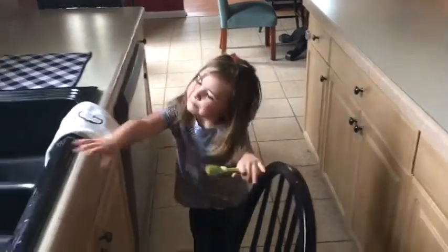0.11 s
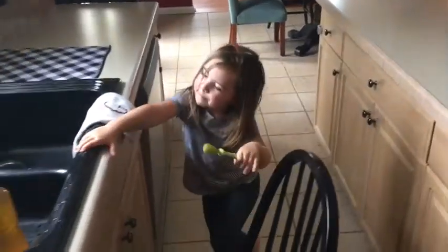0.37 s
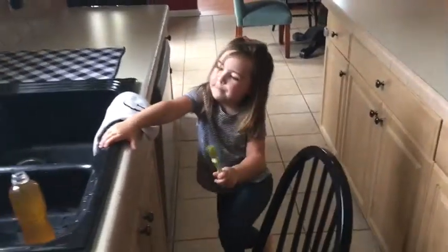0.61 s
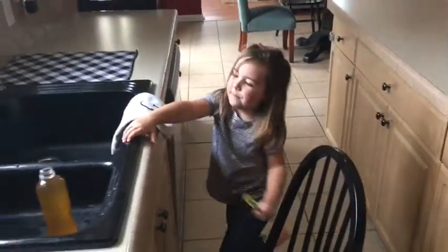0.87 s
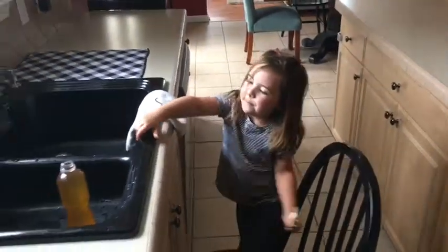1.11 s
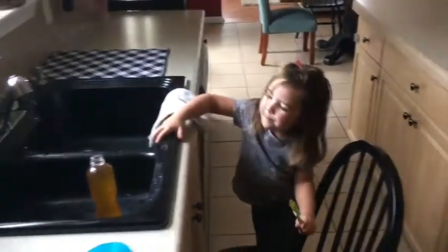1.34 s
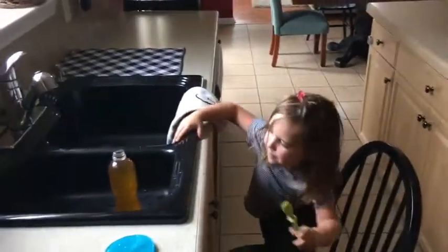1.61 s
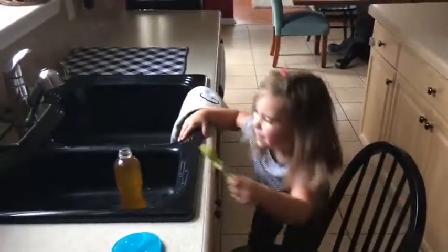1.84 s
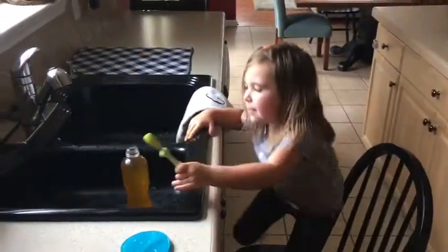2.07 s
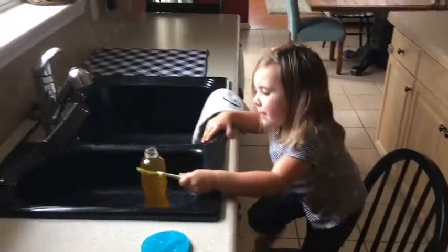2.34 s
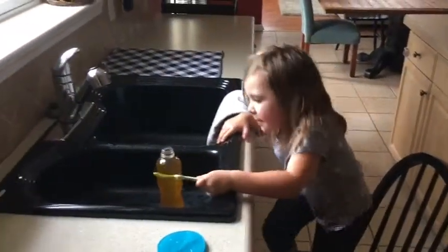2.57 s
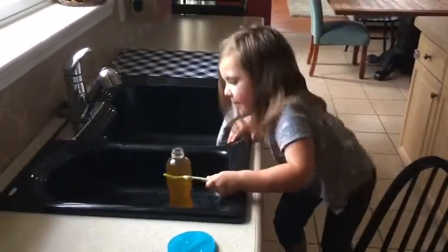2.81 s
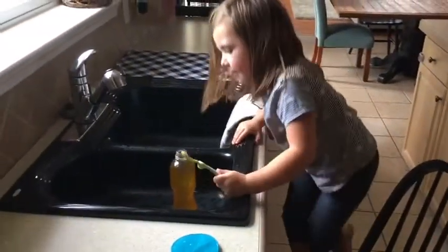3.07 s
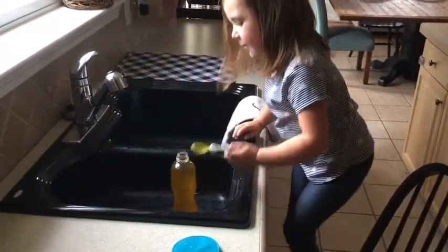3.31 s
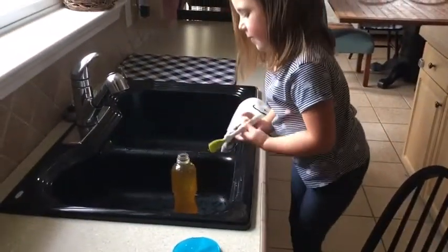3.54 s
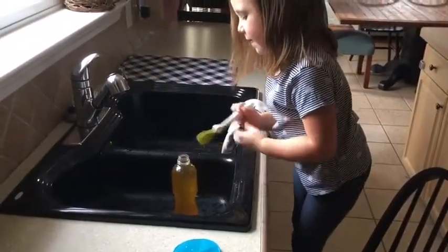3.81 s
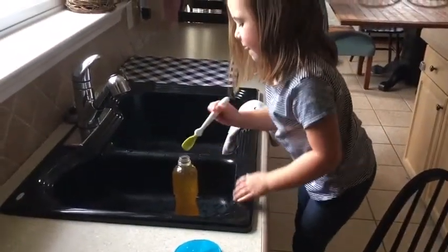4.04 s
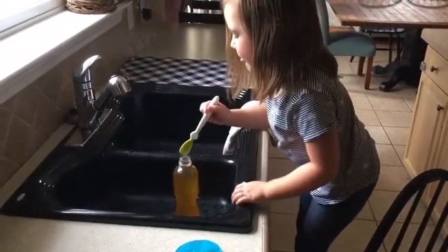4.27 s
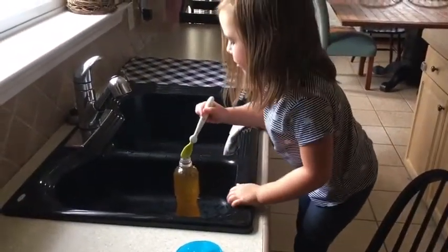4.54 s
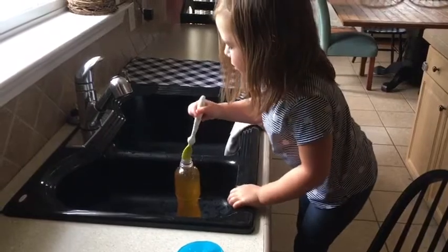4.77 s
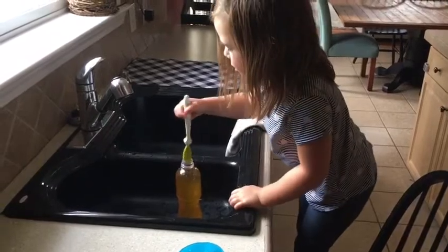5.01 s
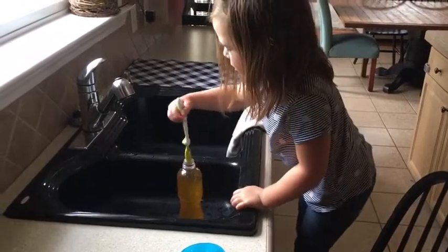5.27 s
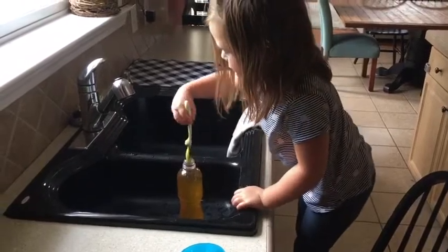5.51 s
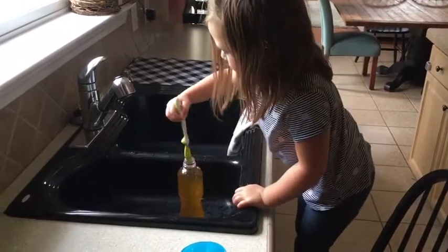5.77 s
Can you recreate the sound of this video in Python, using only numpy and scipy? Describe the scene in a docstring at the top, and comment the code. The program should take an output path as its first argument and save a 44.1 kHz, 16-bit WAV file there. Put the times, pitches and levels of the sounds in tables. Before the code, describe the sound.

Low wooden thuds and small clicks as a chair is climbed, then near silence with a single short tick of spoon on bottle.

```python
"""A kitchen: a small child climbs onto a wooden chair at the sink. Feet and knees thump chair and floor: force
pulses ring the low room modes and the wood. Joints and the spoon's strikes click as short filtered bursts; a
spoon taps sink and bottle, ringing a few modes. Shaped noise gives cloth, shuffling feet and still air; narrow
noise bands give a fridge hum, a thin whine and an insect's faint trill beyond the window."""
import sys
import numpy as np
from scipy import signal
from scipy.fft import rfft, irfft
from scipy.io import wavfile
from scipy.ndimage import uniform_filter1d

SR = 44100
rng = np.random.default_rng(int(sys.argv[2]) if len(sys.argv) > 2 else 0)


def store_pcm(level_fs):
    """Save levels as 16-bit WAV."""
    pcm = np.round(np.clip(level_fs, -1, 1) * 32767).astype(np.int16)
    wavfile.write(sys.argv[1], SR, np.atleast_2d(pcm).T)


def invert_db(level):
    """Linear amplitude ratio for a level in decibels (20 dB per decade), elementwise."""
    return 10 ** (np.asarray(level, dtype=float) / 20)


N = 259308
T = np.arange(N) / SR


def level(x, rms_db):
    """Scale to an rms level."""
    return x * invert_db(rms_db) / np.sqrt(np.mean(x ** 2))


def curve(rows, col=1):
    """One table column, interpolated along time."""
    rows = np.array(rows)
    return np.interp(T, rows[:, 0], rows[:, col])


def band(x, hz, width_hz):
    """Resonant band-pass, gain 1 at the centre."""
    b, a = signal.iirpeak(min(hz, 0.45 * SR), max(hz / width_hz, 0.3), fs=SR)
    return signal.lfilter(b, a, x)


def narrow_noise(hz, width_hz):
    """White noise through the same resonance twice: a wavering tone."""
    return band(band(rng.standard_normal(N), hz, width_hz), hz, width_hz)


def ring(force, hz, t60_s):
    """One damped mode, driven by a force."""
    pole = np.exp((2j * np.pi * hz - np.log(1000) / t60_s) / SR)
    return signal.lfilter([1], [1, -pole], force).imag


def noise(colour):
    """Noise of rms 1; colour interpolated over log frequency."""
    hz, db = np.transpose(colour)
    f_hz = np.arange(N // 2 + 1) * SR / N + 1e-3
    gain = invert_db(np.interp(np.log(f_hz), np.log(hz), db, left=-90))
    return level(irfft(rfft(rng.standard_normal(N)) * gain, N), 0)


def walk(rate_hz):
    """Random levels held 1 / rate_hz, slewed twice; spread near 1."""
    hold = int(SR / rate_hz)
    steps = np.repeat(rng.standard_normal(N // hold + 1), hold)
    return 3.15 * uniform_filter1d(uniform_filter1d(steps, hold), hold)[:N]


def add(track, s, piece):
    """Mix a piece in at time s."""
    i = int(s * SR)
    track[i:i + len(piece)] += piece[:N - i]


def push(ms):
    """Half-sine force of unit area: softer contact, longer push."""
    p = np.sin(np.linspace(0, np.pi, int(ms * SR / 1000) + 3))
    return p / p.sum()


# still-air colour: [f/Hz, relative density/dB per Hz]
AIR_COLOUR = [(15, -54), (25, -26), (45, -2), (123, -1), (145, -15.5), (175, -13), (335, -21.5), (714, -28),
              (775, -32), (1160, -37.5), (2910, -40.5), (6380, -39.5), (7710, -41.5), (14000, -38),
              (16000, -42)]


def still_air():
    """Still air of the house: coloured noise, level drifting slowly."""
    return noise(AIR_COLOUR) * invert_db(-55 + 0.25 * walk(2.97))


# fridge hum bands: [f/Hz, rms level/dB]
HUM_BANDS = [(59, -63.5), (121, -68), (167, -68), (188, -74), (1385, -85), (1475, -88)]


def fridge_hum():
    """Narrow noise bands waver about the hum's partials."""
    return sum(level(narrow_noise(hz, 12.5), db) for hz, db in HUM_BANDS)


# whine fade: [t/s, level/dB]
WHINE_LEVEL = [(0, -68.5), (.75, -63), (1.1, -76), (1.6, -103)]


def whine():
    """A thin tone near 400 Hz, one very narrow noise band, fades."""
    return level(band(rng.standard_normal(N), 398.6, 2.3), 0) * invert_db(curve(WHINE_LEVEL))


# movement: [t/s, cloth level/dB, shuffle level/dB], before flutter
MOVE_LEVELS = [(0, -67, -58), (.08, -63, -51.5), (.2, -63.5, -60.5), (.46, -64.5, -64.5), (.7, -64.5, -60),
               (.78, -59.5, -56.5), (.9, -73, -57.5), (1.25, -70.5, -68), (1.68, -65.5, -60),
               (1.8, -75.5, -63), (1.89, -64, -65), (1.96, -70.5, -68), (2.7, -74, -60.5),
               (3.1, -74.5, -65), (3.6, -87, -64.5), (3.85, -85, -71.5)]
# rustle colour: [f/Hz, relative density/dB per Hz]
CLOTH_COLOUR = [(1500, -24), (3000, -13), (6000, -14.5), (10000, -13), (13500, -11), (17000, -13)]


def cloth_rustle():
    """Cloth rubs in fine grains: noise with fast and slower flutter."""
    flutter_db = 0.8 * walk(39.7) + 0.49 * walk(260)
    return noise(CLOTH_COLOUR) * invert_db(curve(MOVE_LEVELS, 1) + flutter_db)


# shuffle colour: [f/Hz, relative density/dB per Hz]
SHUFFLE_COLOUR = [(60, -12), (150, 2), (300, 1.5), (600, -11), (1200, -12), (3000, -21.5), (6000, -36.5)]


def foot_shuffle():
    """Feet rub the floor: lower, lumpier noise than cloth."""
    return noise(SHUFFLE_COLOUR) * invert_db(curve(MOVE_LEVELS, 2) + 1.0 * walk(17))


# clicks of joints, and of the spoon on sink and bottle: [t/s, level/dB, f/Hz scaling the body band, relative
# treble level/dB, decay/ms]
CLICK_HITS = [(0.055, -63, 1510, 7, 6.2), (0.0745, -48.5, 1290, -6, 3.6), (0.2577, -61, 3060, 2.5, 7.6),
              (0.7363, -57, 2520, 9.5, 5.4), (0.7978, -41, 1280, -16, 7.7), (0.8985, -57, 2800, -4, 4.5),
              (1.6438, -48.5, 2070, 0.5, 8.1), (1.7248, -55, 1300, -18, 6.9), (2.1126, -39.5, 1630, -41, 6),
              (2.4284, -51.5, 2820, -5, 15), (2.4513, -49, 1500, -17, 9.8), (2.569, -49, 1240, -30, 10),
              (2.617, -43, 1340, -16, 43), (2.803, -51, 1550, -10, 6.8), (2.8127, -43, 2160, -7, 8.2),
              (3.3137, -54.5, 1820, -11, 13), (3.3613, -49, 1460, -13, 8.6), (3.406, -52, 1730, -10.5, 15),
              (3.5493, -47, 2030, -11, 11.5), (3.6077, -58, 2240, -1.5, 19), (4.0569, -61, 2080, -16, 5.1),
              (5.0812, -55.5, 2470, 2.5, 5.4), (5.0915, -42.5, 2300, -5, 7.8)]


def sharp_clicks():
    """Sharp edge plus decaying grit, in body and treble bands; returns direct sound and echo send."""
    near, send = np.zeros(N), np.zeros(N)
    t = np.arange(SR // 10) / SR
    treble = signal.butter(2, 4300, "high", fs=SR, output="sos")
    for s, db, hz, treble_db, decay_ms in CLICK_HITS:
        body = signal.butter(3, [hz / 3.23, hz * 1.424], "band", fs=SR, output="sos")
        burst = rng.standard_normal(len(t)) * np.exp(-t * 1000 / max(decay_ms, 0.3))
        edge = (t == 0) * np.sqrt(np.sum(burst ** 2))  # same energy as the burst
        for track, source in ((near, burst + 0.22 * edge), (send, edge)):
            low = signal.sosfilt(body, source) * np.sqrt(SR / 2.8 / hz)
            high = signal.sosfilt(treble, source + 0.92 * band(source, 5660, 1950))
            add(track, s, invert_db(db) * (low + invert_db(treble_db) * high))
    return near, send


# echo bands: [f/Hz, relative level/dB, t60/s]
ROOM_BANDS = [(251, 1.5, 0.44), (730, -1, 0.46), (1500, -3.5, 0.57), (3450, -2.5, 0.57), (8100, -4.5, 0.36)]


def kitchen_echo(x):
    """Hard walls and tiles: a dense tail thickens at first, then dies, soonest in the top band."""
    build_ms = 14.6
    t = T[:SR // 2]
    tail = np.zeros(len(t))
    for hz, db, t60_s in ROOM_BANDS:
        tail += invert_db(db - 60 * t / t60_s) * band(rng.standard_normal(len(t)), hz, hz)
    tail *= 1 - np.exp(-t * 1000 / build_ms)
    return signal.fftconvolve(x, tail * invert_db(-15))[:N]


# blows: [t/s, level/dB, lean to high booms/dB per octave, wood re blow/dB, rebound re blow/dB]
BLOWS = [(0.083, -67, 7, 6, -20), (0.155, -51.5, -11, -6, -14), (0.63, -52.5, -9, -3.5, -8),
         (0.794, -25, 6, -8, -0.5), (1.127, -61, -26, -19, -9), (2.113, -57.5, -6, 9, -1),
         (2.448, -49.5, -6, -11, -15), (2.519, -53.5, -24, -23, 5), (2.6131, -25, 3, -1, 1),
         (2.802, -20.5, 1, -16.5, -11), (3.301, -28.5, -1.5, -28.5, -3.5), (3.364, -34, -1.5, -14, -22),
         (3.404, -46, 11, -8.5, -10), (3.560, -35.5, 1.5, -14.5, -9), (3.614, -45, -1, -22, -12)]
# chair drops back after a blow: [delay/s, level re rebound/dB, four boom shares/dB, wood/dB]
CHAIR_REBOUNDS = [(.025, -2.5, [-2, -13, 4, -7.5], -20), (.064, -5, [-5, -10, -6.5, -3], -13.5)]
# standing waves of kitchen and floor, four groups: [f/Hz, relative level/dB, t60/s]; a close pair beats
BOOM_MODES = [
    [(120, 0.5, 0.097), (122.14, 10, 0.25)],
    [(159.3, -14, 0.96), (157.3, 10, 0.11)],
    [(186, -8, 0.21), (218.9, 6.5, 0.26), (227, -7, 0.51)],
    [(235.9, 7.5, 0.24), (280, -17, 0.23), (267.3, 4, 0.38), (293, -1, 0.46), (313.3, -7, 0.32),
     (355, -12, 0.33), (410, -1, 0.25)],
]
# part of a blow reaching each boom group: [share/dB]
BOOM_SHARES_DB = [-4, -3, -2, -1.5]
# push length for each boom group: [length/ms]
BOOM_PUSH_MS = [5.14, 3.55, 3.65, 2.87]
# chair modes: [f/Hz, relative level/dB, t60/s]
WOOD_MODES = [(379, 5, 0.045), (458, 1, 0.084), (528, 5, 0.052), (618.6, -1, 0.099), (714, 4.5, 0.032),
              (869, 0, 0.062), (936, 0, 0.089), (1176, 3.5, 0.029), (1336, -3.5, 0.046), (1668, -6, 0.044),
              (1896, -23, 0.049), (1950, -50, 0.006)]


def thumps():
    """Blows and rebounds push the room's low modes and the chair's wood; returns boom and wood."""
    knock_ms, spot_spread_db = 0.48, 2.5
    force = np.zeros((len(BOOM_MODES), N))
    knock = np.zeros((len(WOOD_MODES), N))
    octaves = np.log2([group[0][0] / BOOM_MODES[2][0][0] for group in BOOM_MODES])
    for s, db, lean_db, wood_db, rebound_db in BLOWS:
        spot_db = spot_spread_db * rng.standard_normal(len(WOOD_MODES))  # each spot favours other modes
        hits = [(0.0027, 0.006, BOOM_SHARES_DB, wood_db)]
        for delay_s, fall_db, shares_db, hard_db in CHAIR_REBOUNDS:
            hits.append((delay_s, rebound_db + fall_db, shares_db, hard_db))
        for delay_s, re_blow_db, shares_db, hard_db in hits:
            hit_db = db + re_blow_db
            for g in range(len(BOOM_MODES)):
                boom_db = hit_db + shares_db[g] + lean_db * octaves[g]
                add(force[g], s + delay_s, invert_db(boom_db) * push(BOOM_PUSH_MS[g]))
            for k in range(len(WOOD_MODES)):
                add(knock[k], s + delay_s, invert_db(hit_db + hard_db + spot_db[k]) * push(knock_ms))
    boom, wood = np.zeros(N), np.zeros(N)
    for g, group in enumerate(BOOM_MODES):
        sign = (-1) ** (g // 2)  # two lower groups move against the two upper
        for hz, db, t60_s in group:
            boom += sign * invert_db(db - 3.5) * ring(force[g], hz, t60_s)
    # a small body radiates little below its lowest mode
    boom = signal.sosfilt(signal.butter(2, 80, "high", fs=SR, output="sos"), boom)
    for k, (hz, db, t60_s) in enumerate(WOOD_MODES):
        wood += (-1) ** k * invert_db(db - 5.5) * ring(knock[k], hz, t60_s)
    return boom, wood


# floor flexes: [t/s, level/dB, f/Hz]
FLEXES = [(.80, -40, 55.6), (0.911, -35.5, 57.2), (1.158, -46, 59.5), (2.43, -45, 61.3),
          (2.641, -33.5, 58.3), (2.861, -36, 56), (3.061, -46, 65.6), (3.349, -29.5, 56.1),
          (3.412, -31.5, 49.6), (3.521, -33, 61.2), (3.62, -35, 56.8), (3.728, -44, 60.7)]


def floor_flex():
    """The floor flexes as weight shifts: low sines swell and die."""
    track = np.zeros(N)
    t = np.arange(SR // 3) / SR
    swell = (t / 0.023 * np.exp(1 - t / 0.024)) ** 0.81
    for s, db, hz in FLEXES:
        add(track, s, invert_db(db) * swell * np.sin(2 * np.pi * hz * t))
    return track


def taps(hits, modes):
    """A hard light object sets a few modes ringing."""
    force = np.zeros(N)
    for s, db in hits:
        add(force, s, invert_db(db) * push(0.08))
    return sum((-1) ** k * invert_db(db) * ring(force, hz, t60_s) for k, (hz, db, t60_s) in enumerate(modes))


# spoon on sink: [t/s, level/dB]
SINK_HITS = [(1.6445, -58), (1.7255, -70)]
# sink modes: [f/Hz, relative level/dB, t60/s]
SINK_MODES = [(1344, -3, 0.18), (2520, -4, 0.043), (3800, -10, 0.15), (5120, -5, .03), (6470, -5, 0.066)]


def sink_taps():
    """The spoon rings the sink's modes."""
    return taps(SINK_HITS, SINK_MODES)


# trill: [t/s, level/dB]
TRILL_LEVEL = [(4.2, -100), (4.4, -89), (5.0, -81), (5.88, -86)]


def insect_trill():
    """A noise band near 6.3 kHz, pulsed at 13.5 Hz over a steady floor."""
    throb = 0.3 + np.maximum(np.sin(2 * np.pi * 13.5 * T), 0) ** 1.5
    tone = band(band(rng.standard_normal(N), 6300, 620), 6400, 620)
    return level(throb * tone, 0) * invert_db(curve(TRILL_LEVEL))


# spoon on bottle: [t/s, level/dB]
BOTTLE_HITS = [(5.0915, -41)]
# bottle modes: [f/Hz, relative level/dB, t60/s]
BOTTLE_MODES = [(465, -7, 0.011), (960, -20, 0.058), (1690, -5, 0.024), (1810, -9, 0.04),
                (2530, -14, 0.032), (3170, -12, 0.04)]


def bottle_taps():
    """The spoon rings the bottle's short modes."""
    return taps(BOTTLE_HITS, BOTTLE_MODES)


def scene():
    """Blows, clicks and taps, direct and off the walls, over movement and the house."""
    background = still_air() + fridge_hum() + whine() + insect_trill()
    movement = cloth_rustle() + foot_shuffle()
    near, send = sharp_clicks()
    boom, wood = thumps()
    boom = boom + floor_flex()
    rings = sink_taps() + bottle_taps()
    echo = kitchen_echo(invert_db(-18.5) * send + invert_db(-14.5) * wood + invert_db(-22) * boom + invert_db(-14.0) * rings)
    return (boom + wood + near + rings + echo + movement + background)[None]


def band_limit(x):
    """A steep low-pass at the top of the band."""
    return signal.sosfilt(signal.butter(12, 16820, fs=SR, output="sos"), x)


# microphone port notches: [f/Hz, width/Hz, depth/0-1]
PORT_NOTCHES = [(4830, 880, 0.4), (7680, 1100, 0.33), (10380, 530, 0.56)]


def record(dry):
    """The phone's microphone port notches the treble; deepest bass and very top are cut."""
    for hz, width_hz, depth in PORT_NOTCHES:
        dry = dry - depth * band(dry, hz, width_hz)
    dry = signal.sosfilt(signal.butter(2, 35, "high", fs=SR, output="sos"), dry)
    mix = signal.sosfilt(signal.ellip(8, 0.2, 14, 15850, fs=SR, output="sos"), dry)
    return band_limit(mix)


dry = scene()
out = record(dry)
store_pcm(out)
```